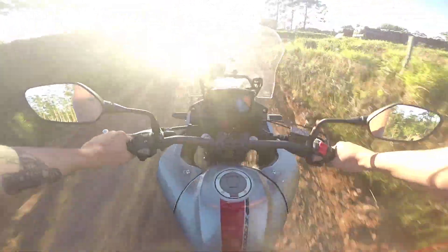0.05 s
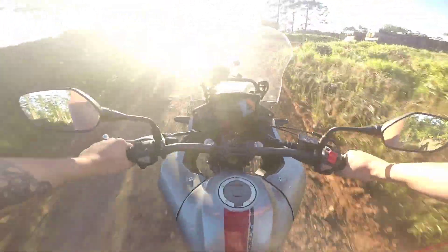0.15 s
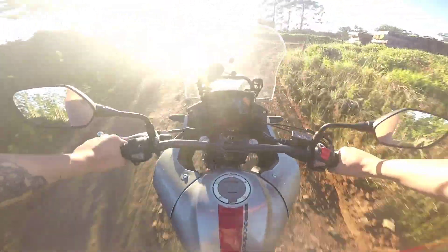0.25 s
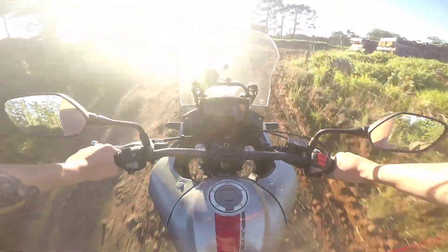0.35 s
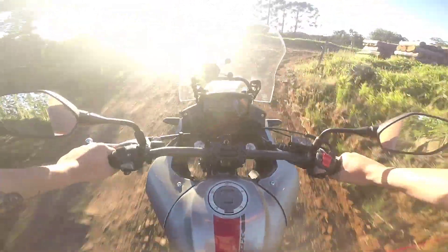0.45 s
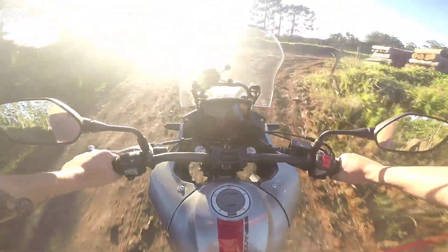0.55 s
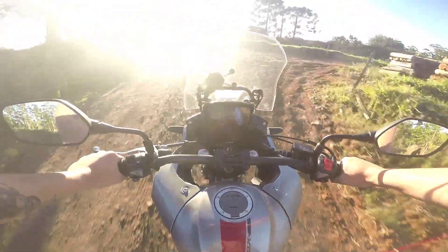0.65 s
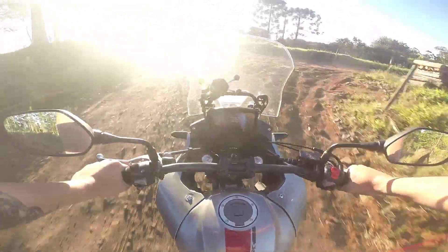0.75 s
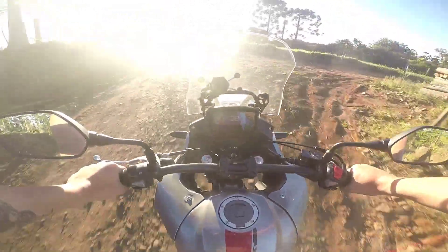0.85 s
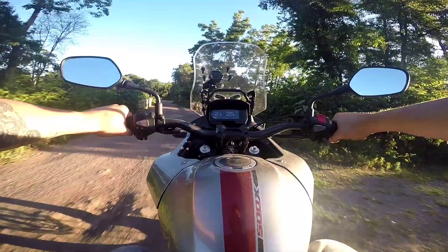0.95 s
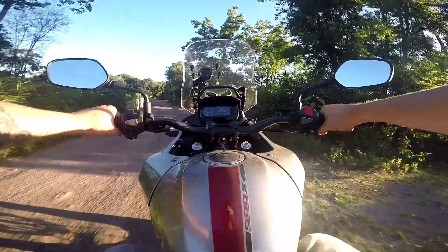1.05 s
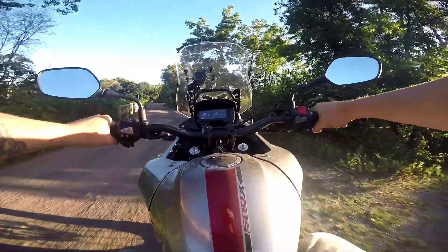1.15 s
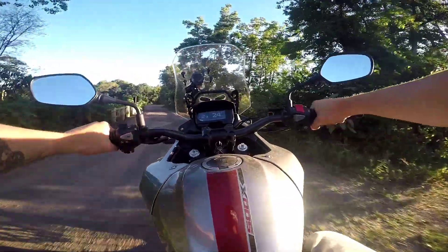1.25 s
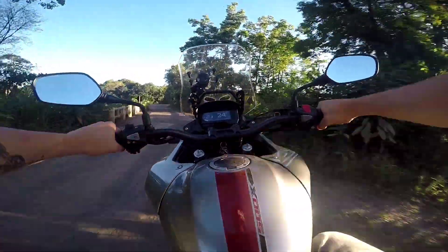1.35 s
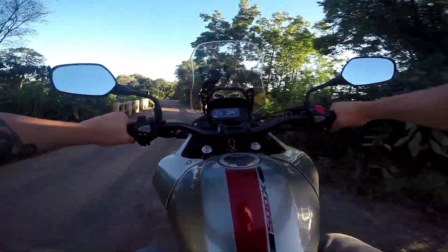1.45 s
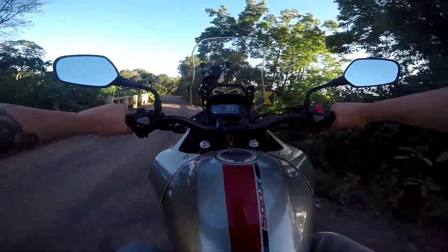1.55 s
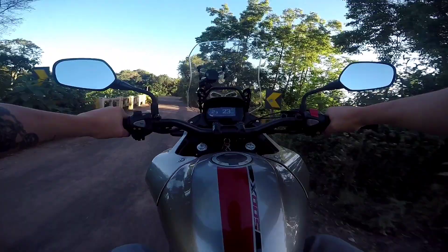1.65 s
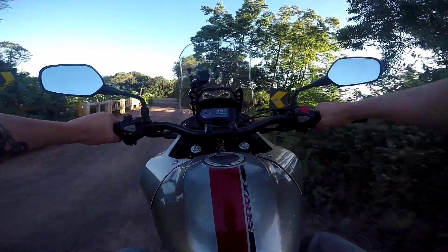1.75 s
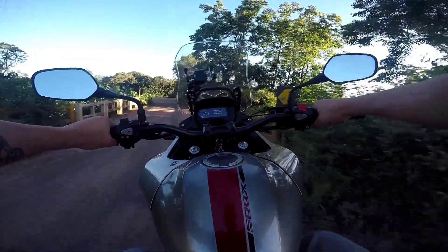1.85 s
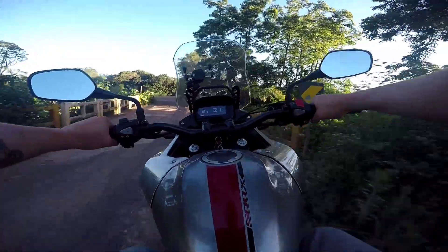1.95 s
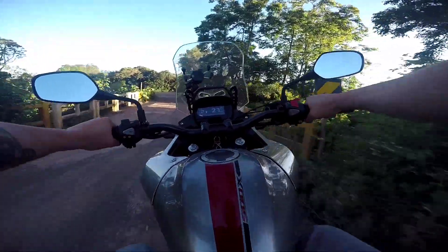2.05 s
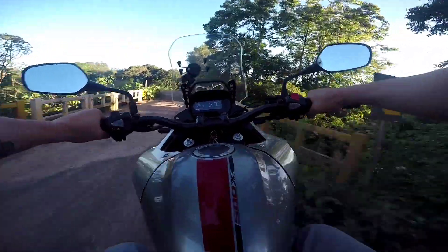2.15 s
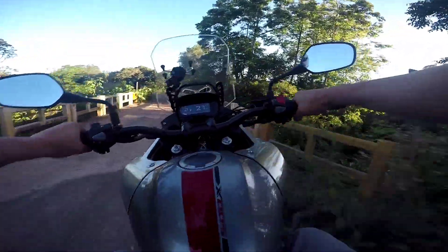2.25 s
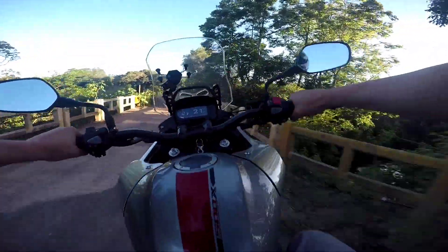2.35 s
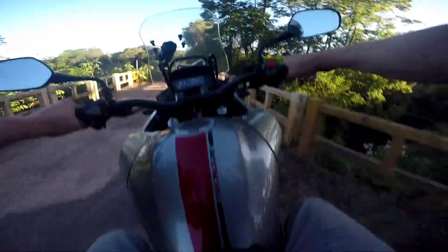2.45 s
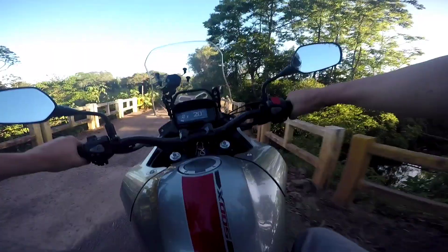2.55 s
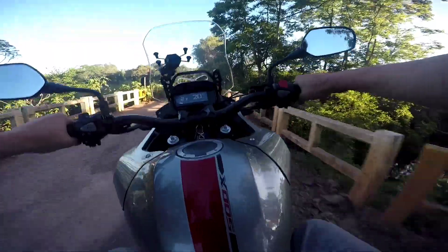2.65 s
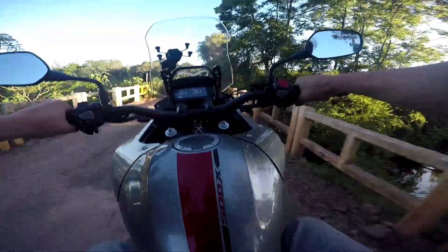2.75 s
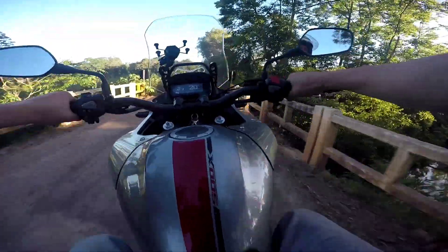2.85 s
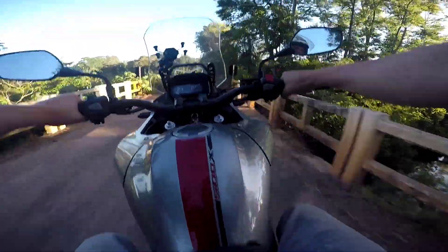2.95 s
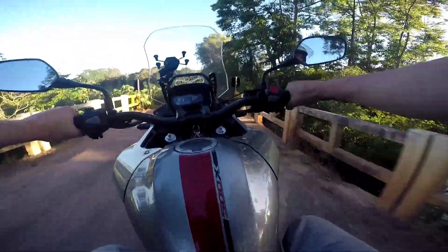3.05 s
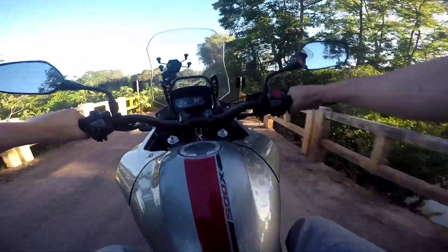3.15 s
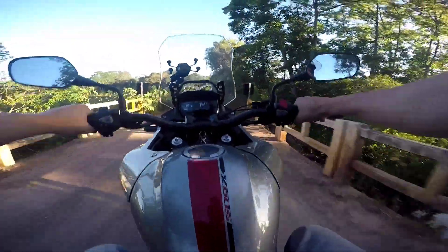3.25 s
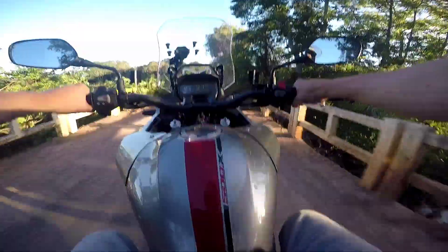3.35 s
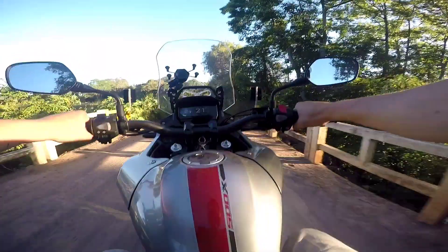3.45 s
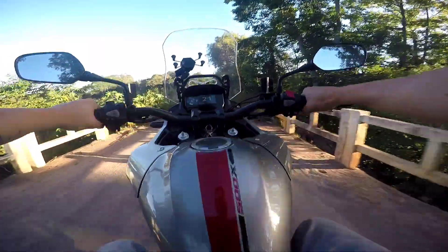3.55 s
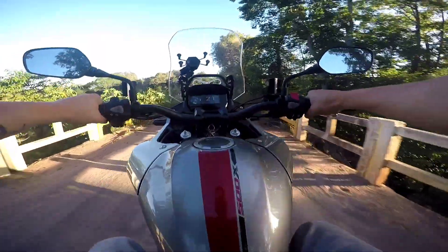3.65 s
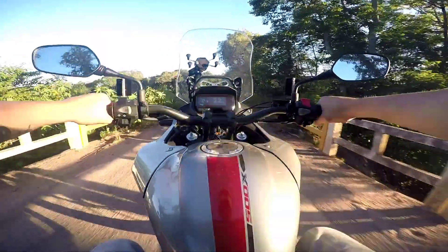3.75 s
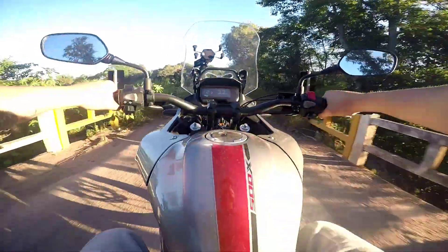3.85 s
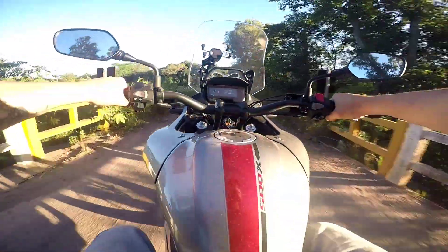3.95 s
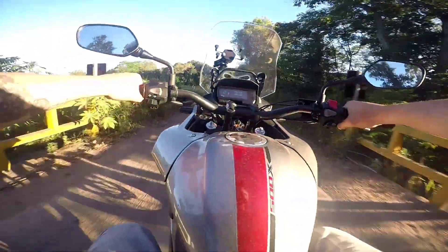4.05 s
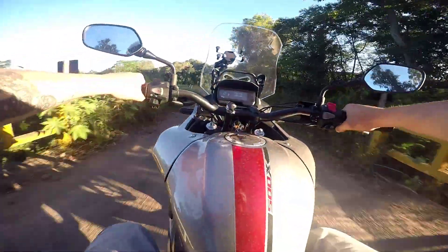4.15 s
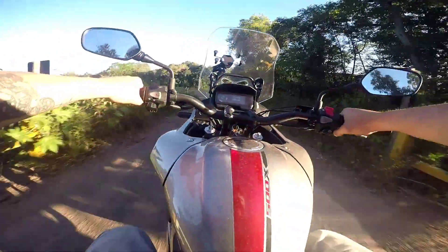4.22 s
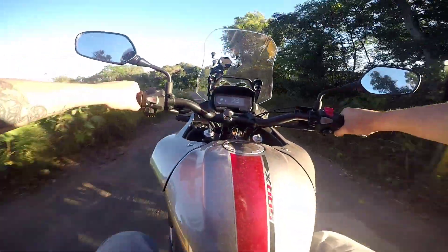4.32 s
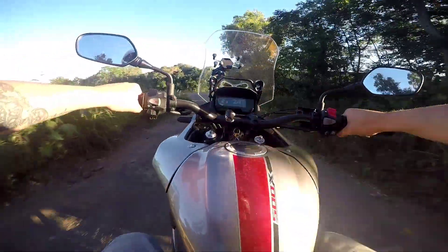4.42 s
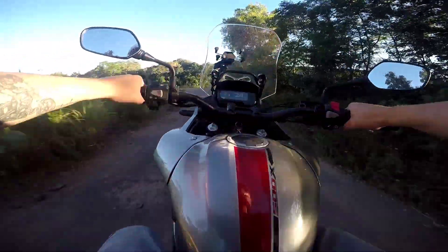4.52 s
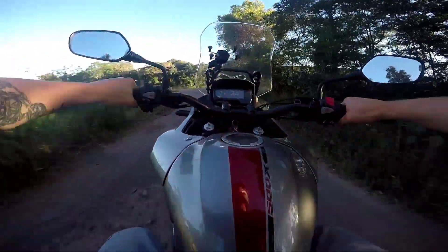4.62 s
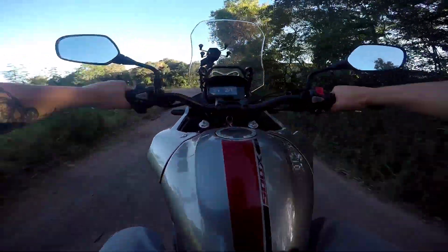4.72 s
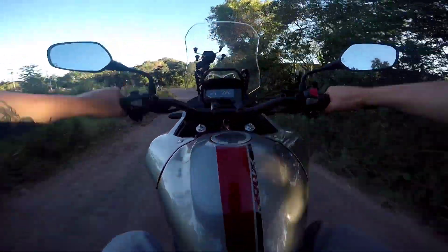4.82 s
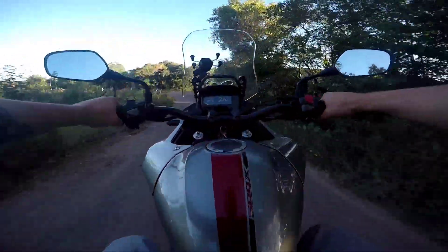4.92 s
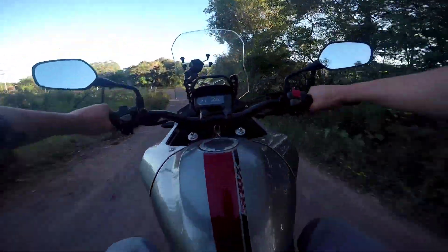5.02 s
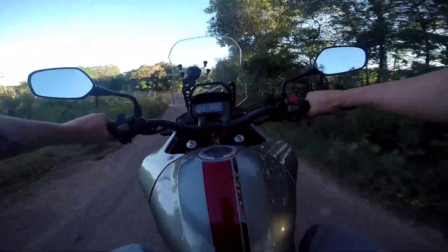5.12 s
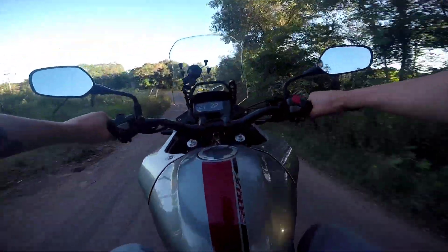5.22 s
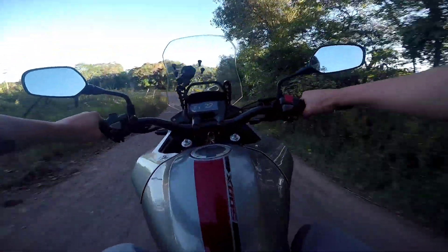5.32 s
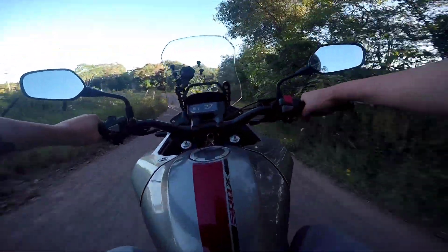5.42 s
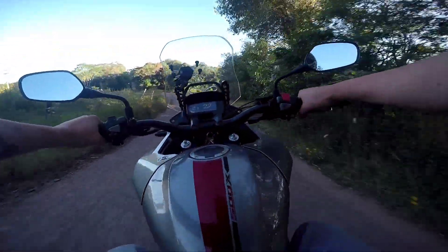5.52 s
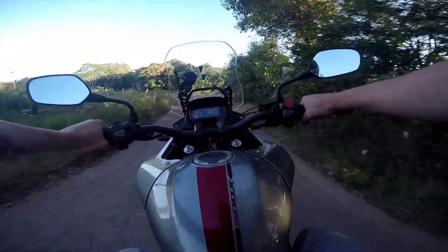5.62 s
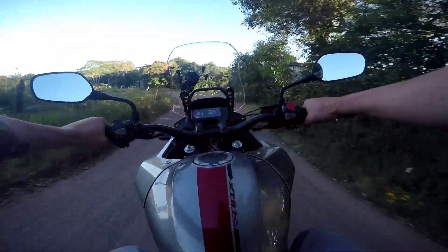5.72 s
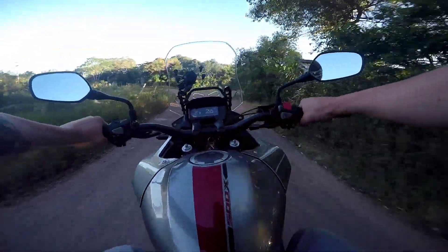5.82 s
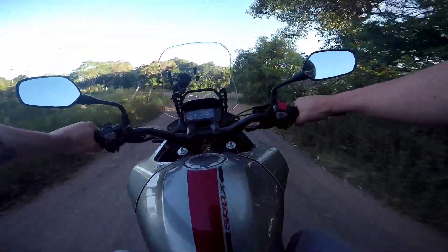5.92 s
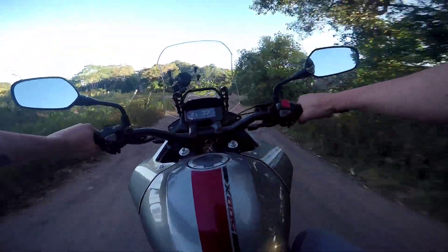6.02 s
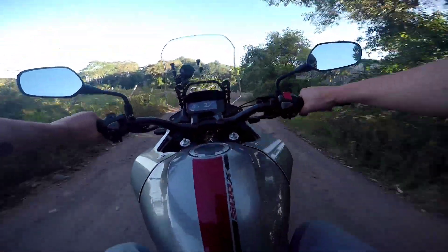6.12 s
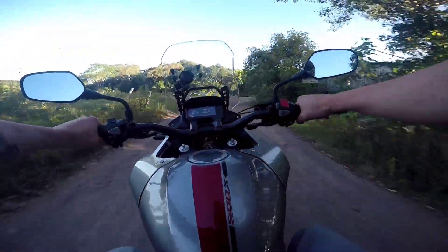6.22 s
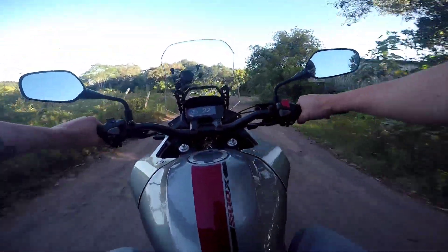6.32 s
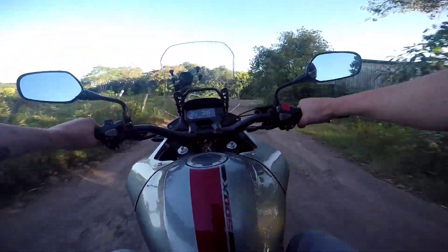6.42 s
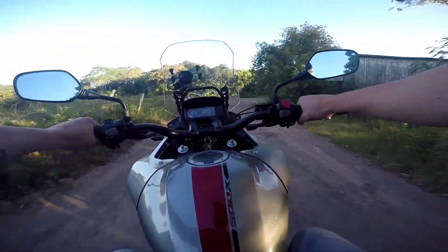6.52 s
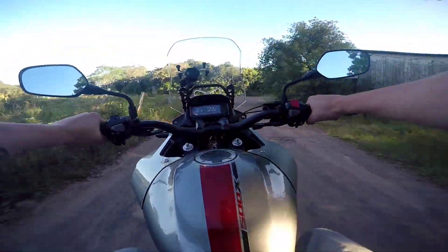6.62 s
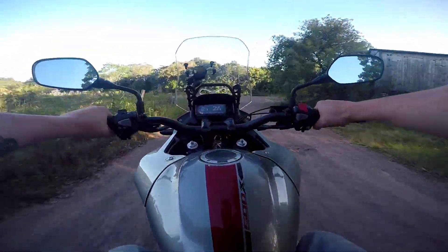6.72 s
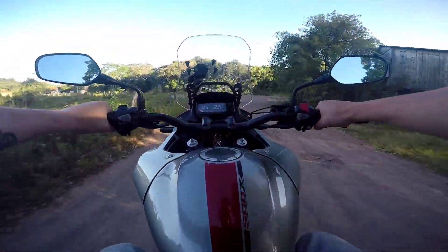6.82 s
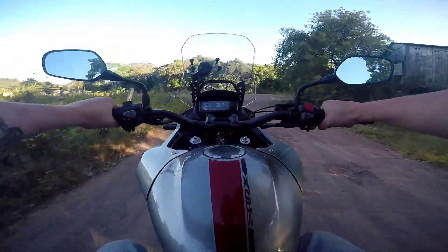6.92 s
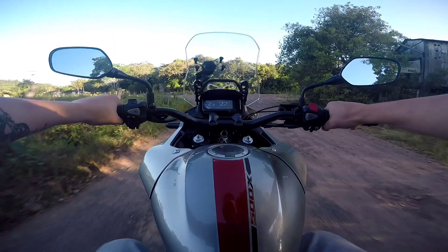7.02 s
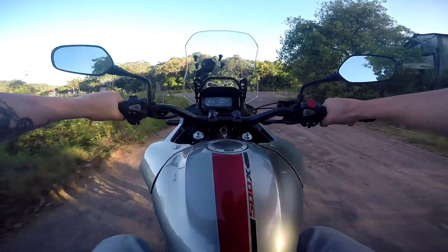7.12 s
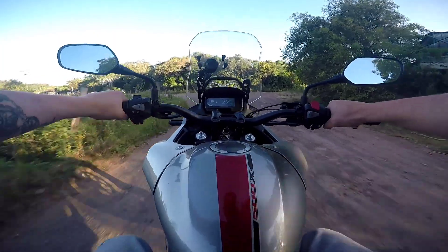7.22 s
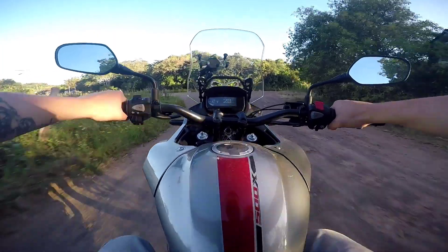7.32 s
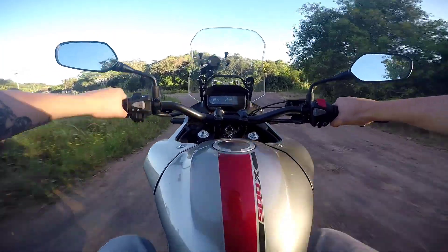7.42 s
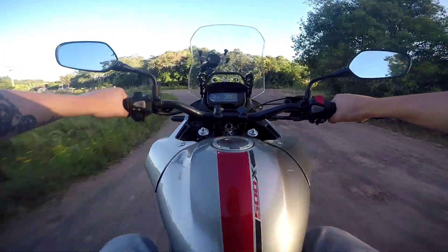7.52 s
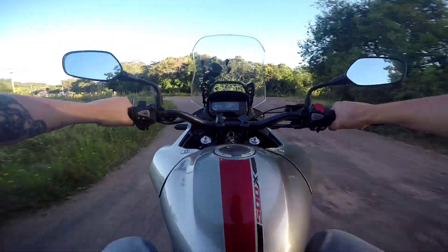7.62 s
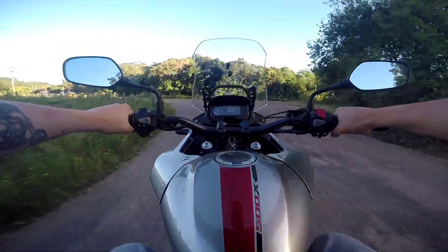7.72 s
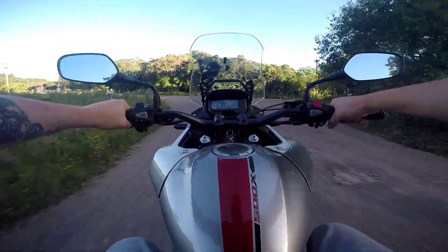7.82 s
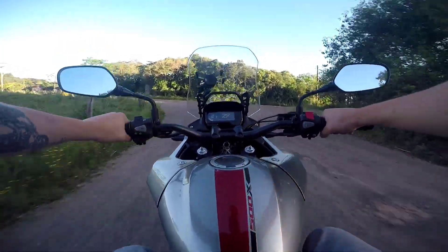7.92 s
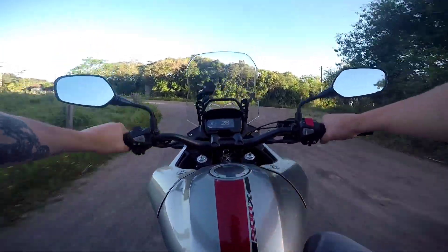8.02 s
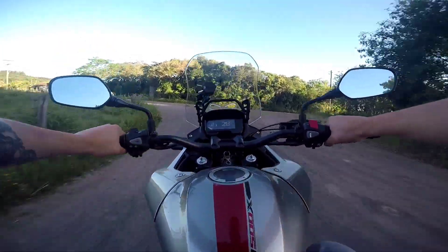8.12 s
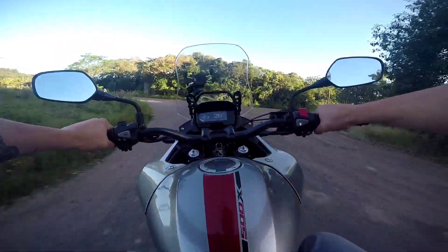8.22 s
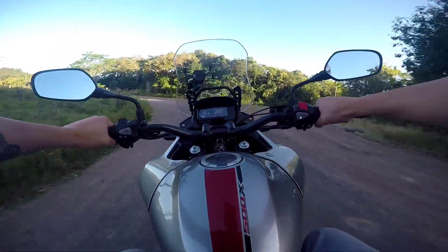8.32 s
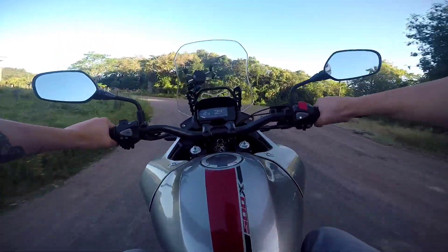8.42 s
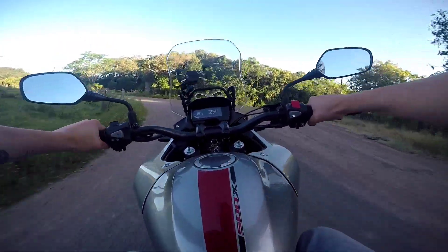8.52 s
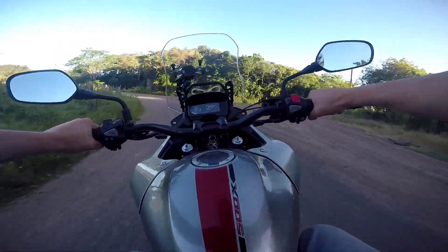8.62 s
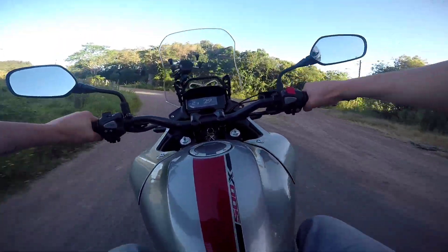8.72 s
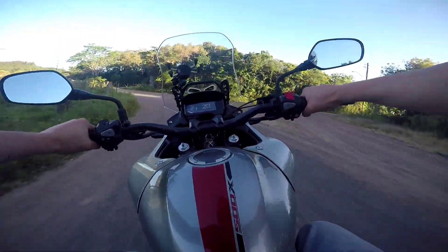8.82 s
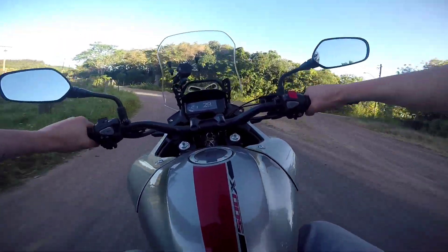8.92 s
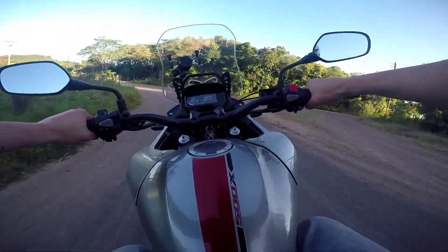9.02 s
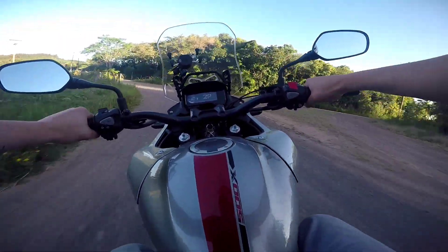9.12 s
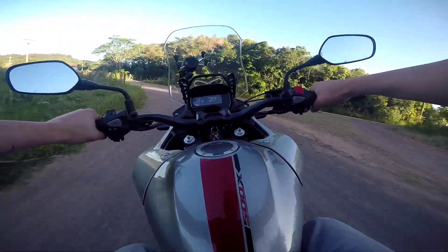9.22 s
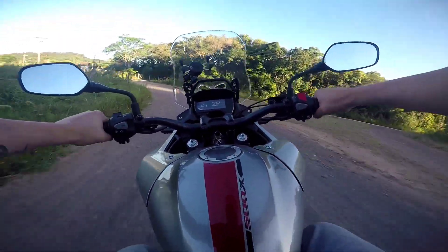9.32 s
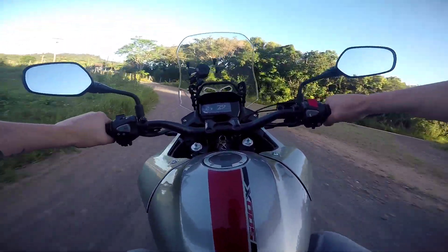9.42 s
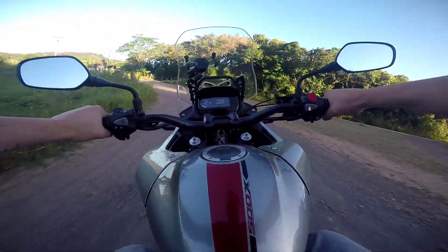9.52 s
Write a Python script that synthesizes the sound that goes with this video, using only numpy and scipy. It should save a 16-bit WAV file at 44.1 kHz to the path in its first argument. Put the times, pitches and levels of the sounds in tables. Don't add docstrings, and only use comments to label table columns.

```python
import sys
import numpy as np
from scipy import signal
from scipy.fft import rfft, irfft
from scipy.io import wavfile
from scipy.ndimage import uniform_filter1d

SR = 44100
rng = np.random.default_rng(int(sys.argv[2]) if len(sys.argv) > 2 else 0)


def transcribe(signal):
    frames = np.atleast_2d(signal).T
    limited = np.clip(frames, -1, 1)
    pcm = np.round(limited * 32767).astype(np.int16)
    wavfile.write(sys.argv[1], SR, pcm)


def ratio(d):
    e = np.asarray(d, float) / 20
    return 10 ** e


N = 421596
TIME = np.arange(N) / SR
CUT_START_S, CUT_END_S = .9213, .9268


def unit(x):
    return x / np.sqrt(np.mean(np.abs(x) ** 2))


def ring(x, hz, width):
    r = np.exp(-np.pi * 1.5 * width / SR)
    pole = r * np.exp(2j * np.pi * hz / SR)
    return signal.lfilter([(1 - r) ** 2], [1, -2 * pole, pole ** 2], x)


def band(x, low_hz, high_hz):
    return signal.sosfilt(signal.butter(2, [low_hz, high_hz], "bandpass", fs=SR, output="sos"), x)


def walk(rate):
    hold = int(SR / rate)
    levels = np.repeat(rng.standard_normal(N // 200), hold)[:N]
    return unit(uniform_filter1d(uniform_filter1d(levels, hold), hold))


def columns(rows):
    s, *values = np.transpose(rows)
    return [np.interp(TIME, s, v) for v in values]


def swells(rows):
    s, half_s, *values = np.transpose(rows)
    coarse = TIME[::64]
    bells = np.exp(-((coarse - s[:, None]) / half_s[:, None]) ** 2)
    return [np.interp(TIME, coarse, v @ bells) for v in values]


def coloured(spectrum, alike):
    hz, db = np.transpose(spectrum)
    common, left, right = rng.standard_normal((3, N))
    pair = np.sqrt(alike) * common + np.sqrt(1 - alike) * np.array([left, right])
    bins_hz = np.arange(N // 2 + 1) * SR / N
    gain = ratio(np.interp(np.log(bins_hz + 1), np.log(hz), db))
    return unit(irfft(rfft(pair) * gain, N))


def body(modes, gate, grit_db, flicker_db, swell_db):
    out, swell = 0, swell_db * walk(6.6)
    for hz, width, db, pan_db, lead, alike in modes:
        grains = np.minimum(rng.exponential(size=N // 128 + 1), 4)
        grit = np.repeat(ratio(grit_db * grains), 128)[:N]
        common, left, right = (unit(ring(grit * gate * v, hz, width)) for v in rng.standard_normal((3, N)))
        pair = np.sqrt(alike) * np.array([common * np.exp(1j * lead), common])
        pair = pair + np.sqrt(1 - alike) * np.array([left, right])
        pan = np.array([[pan_db], [-pan_db]]) / 2
        out = out + ratio(db + swell + flicker_db * walk(14) + pan) * pair.real
    return out / np.std(out.mean(axis=0))


def crank():
    # t/s, cycle rate/Hz
    speed = [(0, 23.05), (.92, 23.05), (.93, 20.5), (1.27, 18.8), (2.1, 16.9), (3.04, 17.05), (3.64, 18.05),
             (4.59, 21.05), (5.4, 22.7), (5.64, 22), (6.11, 21.5), (6.73, 21.75), (7.21, 22.65),
             (7.75, 24.9), (8.05, 23.6), (8.45, 23.7), (9.12, 23.9), (9.58, 23.2)]
    # t/s, half length/s, change/Hz
    bends = [(1.55, .25, .36), (2.4, .25, -.32), (2.1, .1, -.5), (2.95, .2, -.55), (3.8, .15, .5),
             (5.52, .06, -2.3), (6.6, .3, .15), (7.92, .08, -1.6), (8.61, .07, 1.6), (8.72, .05, -1),
             (9.29, .09, -1.7)]
    start = .125 + .57 * (TIME > CUT_END_S)
    return np.cumsum(columns(speed)[0] + swells(bends)[0]) / SR + start


def exhaust(cycles, shut, load_db):
    # f/Hz, width/Hz, level/dB
    upper_modes = [(150, 60, 1), (240, 36, 1.5)]
    # t/s, half length/s, change/dB
    throttle = [
        (5.65, .2, -3),
        (6.2, 0.21, -3.5),
        (7.6, 0.32, 4.5),
        (8.15, 0.31, -5),
        (8.75, 0.074, -1),
        (9.2, .3, -1.5),
    ]
    bright_db = swells(throttle)[0]
    upper_db = -26 - 16 * shut + swells([(4.05, 1.0, 15)])[0]

    first = np.arange(1, int(cycles[-1]))
    chance = rng.standard_normal((300, 4))[:len(first)].T
    jitter = .003
    pulses, puffs = np.zeros((2, N))
    for k, (place, db) in enumerate([(0, 0), (.247, -1.5)]):
        at = np.interp(first + place + jitter * chance[k], cycles, np.arange(N)).astype(int)
        pulses[at] = ratio(db + .5 * chance[k + 2])
        at = np.interp(first + place + 4 * jitter * chance[k], cycles, np.arange(N)).astype(int)
        puffs[at] = ratio(2 * chance[k + 2])

    pipe = unit(band(ring(pulses, 101, 50).imag, 72, 145))
    turn = np.exp(10j * np.pi * cycles)
    still = pipe / turn
    slow = uniform_filter1d(still.real, size=2000) + 1j * uniform_filter1d(still.imag, size=2000)
    pipe = pipe + (ratio(bright_db) - 1) * 2 * (slow * turn).real

    upper = sum(ratio(db) * ring(pulses, hz, width).imag for hz, width, db in upper_modes)
    upper = unit(band(upper, 110, 330))
    drone = unit(band(ring(pulses, 71, 30).imag, 40, 120))
    puff = unit(band(band(ring(puffs, 92, 90).imag, 40, 170), 40, 170))
    pulling = ratio(upper_db + bright_db) * upper - pipe - ratio(-26 - 1.01 * bright_db) * drone
    boom = ratio(load_db + 3.5) * ((1 - shut) * pulling + shut * ratio(1) * puff)
    return np.array([np.roll(boom, 22), boom])


def shell(gate, shaken_db):
    # f/Hz, width/Hz, level/dB, left minus right/dB, left lead/rad, share alike
    shell_modes = [(95.8, 32, -4.5, -1, 2.7, 0.29), (130, 122, -9, 2, 2.13, 0.41),
                   (265, 120, -6.5, -2.5, 2.6, 0.72), (428, 222, -8, -4.5, 2.89, 0.91),
                   (602, 90, -5.5, -4, 2.94, 0.97), (773, 133, -10, -7.5, 3.05, 0.91),
                   (1066, 180, -4.5, 1, 2.75, 0.98), (1220.5, 62, -8, 2.5, 3.08, 0.94)]
    return ratio(shaken_db) * body(shell_modes, gate, 2.85, 0.76, 0.48)


def panel(gate, air_db):
    # f/Hz, width/Hz, level/dB, left minus right/dB, left lead/rad, share alike
    panel_mode = [(827.7, 61, 0, -2.5, 2.59, 0.98)]
    # t/s, half length/s, level/dB
    spells = [(0, 0.33, 5.5), (1.1, 0.26, 10), (2.35, 0.51, 2), (3.12, 0.13, 9.5), (4.7, 0.15, 2),
              (5.3, 0.11, 2.5), (5.9, 0.55, 8), (6.91, 0.19, 11.5), (7.54, 0.34, 5), (8.12, 0.16, 5.5),
              (9.35, 0.18, 10)]
    return ratio(air_db - 5.5 + swells(spells)[0] + 3) * body(panel_mode, gate, 0.91, 2.1, 0.99)


def port(gate, air_db, load_db, first_scene):
    # f/Hz, width/Hz, level/dB, left minus right/dB, left lead/rad, share alike
    port_modes = [(1770, 215, 5, 7.5, 2, 0.96), (1895, 263, 1.5, -10, 0.27, 0.9),
                  (2298, 320, -8, -16, 1.4, 0.38)]
    port_db = air_db + 9 - 7 * first_scene + 0.13 * (load_db - load_db.mean())
    return ratio(port_db - 0.94) * body(port_modes, gate, 0.69, 0.83, 0.08)


def vent(gate, air_db):
    # f/Hz, width/Hz, level/dB, left minus right/dB, left lead/rad, share alike
    vent_modes = [(2825, 1380, 0.5, -4.5, 0.24, 0.77), (5040, 1250, -4.5, -2, 3.28, 1),
                  (7480, 430, -7, 1.5, 2.1, 0.19)]
    return ratio(air_db - 0.5) * body(vent_modes, gate, 1.0, 0.58, 0.71)


def hiss(air_db):
    # f/Hz, density/dB per Hz
    hiss_spectrum = [(1530, -3.5), (2600, 0), (3300, -7), (4000, -15.5), (4440, -7.5), (4900, -12),
                     (6540, -9.5), (7640, -12), (8250, -11.5), (12400, -24), (13200, -28), (15500, -30)]
    flutter_db = 0.65 * walk(30) + .5 * walk(7.2)
    left, right = ratio(air_db + 2 + flutter_db) * coloured(hiss_spectrum, 0.25)
    return np.array([np.roll(left, 21), right])


def buffet(road_db, gust_db):
    # f/Hz, density/dB per Hz
    buffet_spectrum = [(4, -25), (9, 0), (20, -6), (32, -13.5), (45, -18), (80, -24), (150, -32),
                       (700, -125)]
    return ratio(road_db + 6.5 + gust_db + 5 * walk(7.2)) * coloured(buffet_spectrum, 0.58)


def rattles():
    # t/s, peak/dB, ring f/Hz, fade/s
    taps = [(0.0315, -11, 880, 0.0033), (0.082, -21, 570, 0.014), (0.098, -19, 946, 0.0086),
            (0.099, -9, 540, 0.0018), (0.106, -6, 730, 0.0027), (0.228, -23, 850, 0.0062),
            (0.44, -4, 794, 0.0022), (0.596, -54, 806, 0.005), (1.1, -21, 843, 0.01),
            (1.104, -44, 895, 0.0068), (2.448, -42, 501, 0.0046), (2.448, -18, 501, 0.002),
            (2.455, -36, 905, 0.0037), (2.481, -34, 527, 0.0045), (2.519, -19, 467, 0.0055),
            (2.913, -30, 790, 0.0043), (2.9165, -20.5, 540, 0.0084), (2.93, -23, 510, 0.0054),
            (3.34, -29, 820, 0.005), (3.4065, -15, 1020, 0.0017), (4.78, -25, 575, 0.018),
            (4.973, -18, 600, 0.0036), (4.982, -2, 880, 0.0012), (4.985, -27, 773, 0.005),
            (3.433, -24, 420, 0.0031), (2.8813, -17, 680, 0.0023), (3.2944, -11, 1720, 0.00094),
            (8.6317, -14, 890, .002), (2.462, -24, 620, .003), (2.486, -21, 450, 0.0027),
            (2.528, -22, 600, 0.0027), (3.419, -24, 560, .003), (3.425, -28, 640, 0.0026),
            (2.924, -31, 420, .004), (2.937, -24, 597, .004)]
    # t/s, peak/dB
    pings = [(5.5, -30), (5.56, -20), (5.624, -24), (5.676, -25), (5.741, -21), (5.883, -34), (5.957, -36),
             (6.149, -23), (6.191, -24), (6.31, -47), (6.415, -29), (6.785, -25), (6.839, -42),
             (6.882, -29), (6.927, -23), (6.973, -23), (7.018, -24), (7.061, -22), (7.448, -31),
             (7.498, -30), (7.534, -25), (7.564, -28), (7.604, -23), (7.641, -21), (7.701, -28),
             (7.894, -39), (8.042, -42), (8.134, -24), (8.239, -24), (8.344, -32), (8.433, -31),
             (8.465, -27), (8.518, -27), (8.638, -34), (8.727, -22.5), (8.96, -23), (9.164, -30),
             (9.301, -26), (9.438, -20.5), (9.507, -43)]
    # t/s, peak/dB
    port_ticks = [(4.524, -13.5), (4.9028, -22), (4.9475, -14), (4.983, -11.5), (5.3057, -29),
                  (5.3352, -18), (5.417, -16), (5.8859, -16), (5.9882, -27), (6.2794, -18), (6.4501, -21),
                  (6.6764, -31), (7.2263, -21), (7.3987, -12), (7.4553, -22.5), (7.5398, -14),
                  (7.5701, -25), (7.593, -24), (7.6459, -17), (7.699, -15), (7.7876, -25), (8.2944, -22),
                  (8.5558, -28), (8.6317, -13.5)]
    out, t = np.zeros((2, N)), np.arange(2048) / SR
    for s, db, hz, fade in taps + [(s, db + 4, 836, 0.0072) for s, db in pings]:
        modes = np.sin(2 * np.pi * hz * t) + 0.24 * np.sin(2 * np.pi * 1.2 * hz * t)
        pair = modes * np.array([[-.4], [1]])
        pair = pair + ratio(-22) * np.sin(2 * np.pi * 1850 * t)
        swell = (1 - np.exp(-t / 0.0012)) * np.exp(-t / fade)
        out[:, int(s * SR):][:, :len(t)] += ratio(db + 8) * pair * swell
    tick = np.sin(2 * np.pi * 1822 * t) * (1 - np.exp(-t / 0.001)) * np.exp(-t / 0.003)
    for s, db in port_ticks:
        out[:, int(s * SR):][:, :len(t)] += ratio(db) * tick
    return out


def intake(gate, shut):
    # f/Hz, width/Hz, level/dB, left minus right/dB, left lead/rad, share alike
    breath = [(106.5, 40, 0, 0.02, 0.85, 1)]
    return ratio(-42) * shut * body(breath, gate, 1.0, 1.0, 0.79)


def knocks():
    # t/s, strength/dB, pitch share, gain duck/dB
    jerks = [(2.1799, -0.3, 1.06, 19), (2.3858, 0, 1.06, 27.5), (2.477, -8.5, 0.75, 1.5),
             (2.6018, -1.5, 1, 9), (2.881, -5.5, 0.71, 7), (2.8856, -9, 0.9, -1), (3.057, -1.5, 0.97, 6.5),
             (3.295, 0.5, 1.05, 23), (3.35, -17, 0.83, 8), (3.412, -15, 0.94, 0), (5.9128, -4, 0.89, 1),
             (7.8029, -.5, 0.97, 24), (8.1185, -7.5, 0.86, 1), (1.086, -17, 0.94, 1)]
    # f/Hz, fade/s, growth per ms at the left port, at the right port
    mount_modes = [(162, .002, 0, -.29), (289, .0027, -.3, .68), (445, .0012, 1.19, -1.82),
                   (837, .0017, -.3, .52), (1410, .0005, -.35, .65)]
    out, duck_db = np.zeros((2, N)), np.zeros(N)
    for s, db, pitch, depth_db in jerks:
        t = np.maximum(TIME - s, 0)
        near = slice(int(s * SR), int(s * SR) + 2048)
        u = pitch * t[near]
        for hz, fade, left, right in mount_modes:
            growth = np.array([[left], [right]]) * u / .001
            out[:, near] += ratio(db) * growth * np.exp(-u / fade) * np.sin(2 * np.pi * hz * u)
        out[:, near] += ratio(2 * db - 24) * np.exp(-u / .0015) * np.sin(2 * np.pi * 2080 * u)
        duck_db -= depth_db * (1 - np.exp(-t / 0.00035)) * np.exp(-t / 0.069)
    return out, duck_db


def heaves():
    # t/s, level/dB, f/Hz, left lead/s, direction
    pushes = [(2.434, -11, 26.8, 0.0061, -0.77), (2.46, -5, 32.2, 0.0095, 0.74),
              (2.522, -0.5, 122, 0.0023, 0.54), (2.883, -2.5, 157, -0.0026, 0.66),
              (2.922, -11, 37.8, 0.0052, 0.66), (3.058, -19, 118, -0.013, 0.66),
              (3.344, -18, 110, 0.0061, -0.78), (3.417, -10, 91, 0.0035, -.7),
              (2.4546, -12, 105, .001, -.7), (2.4762, -13, 130, 0.0012, -0.75),
              (3.336, -11.5, 24.2, 0.01, 0.93), (3.408, -21, 66.5, 0, 0.48)]
    out = 0
    for s, db, hz, lead, way in pushes:
        turns = np.clip(hz * (TIME - s + np.array([[lead], [0]])), 0, 1.5)
        out = out + way * ratio(db) * np.sin(2 * np.pi * turns) * np.sin(np.pi * turns / 1.5)
    return out


def gears(cycles):
    blur = walk(39.8) + 1j * walk(39.8)
    tone = (blur * np.exp(2j * np.pi * 37 * cycles)).real
    spell = swells([(4.47, 0.7, 1)])[0]
    return ratio(-38.5) * spell * tone * np.array([[-.2], [1]])


def gap(gate):
    # f/Hz, width/Hz, level/dB, left minus right/dB, left lead/rad, share alike
    whistle = [(3260, 160, 0, 0, .3, 0.7)]
    spell = swells([(8.15, 0.14, 0.95)])[0]
    return ratio(-44.5) * spell * body(whistle, gate, 1.0, 1.0, .5)


def scene():
    # t/s, engine load/dB, air speed/dB, road roughness/dB
    ride = [(0, -27, -44, -30.5), (.92, -28.5, -41, -33.5), (.93, -28, -44.5, -35.5),
            (1.7, -33, -43.5, -37.5), (2.15, -29.5, -46, -33.5), (2.4, -53, -43, -25),
            (2.75, -44, -49.5, -39.5), (2.95, -36, -48.5, -38.5), (3.27, -32, -47, -30.5),
            (3.6, -35, -51, -41), (4.3, -29.5, -43, -37), (5.2, -27, -42, -31), (6.0, -26, -42, -32.5),
            (6.4, -28.5, -43.5, -33.5), (7.1, -26, -43, -35), (7.7, -26.5, -41, -29), (8.3, -28, -43, -34),
            (9.56, -26.5, -42, -25.5)]
    # t/s, half length/s, buffet/dB, rush/dB, shake/dB
    gusts = [(.04, 0.064, 1, 5.5, 3), (.23, 0.035, 8, 0.5, 0), (.5, 0.3, -1.5, 3, 4.5),
             (.78, 0.084, -4.5, -0.5, 2), (1.25, .12, 0, 0.5, 0.5), (8.45, 0.09, 2.5, 1, 1),
             (9.05, 0.12, 2, 0, 0.5), (.88, 0.048, 11.5, 1.5, 2), (3.02, .05, -7, -0.5, 0.5),
             (9.53, .07, -8, 1, 0.5), (6.8, 0.14, 3, 0, 1), (1.48, 0.06, -2, -0.5, 1),
             (2.3, 0.081, -4, -0.5, -4), (2.455, 0.011, 25.5, 13.5, 10), (2.92, 0.028, 2, 7, 13),
             (3.21, 0.074, -2, 1.5, -2), (3.42, 0.065, 12, 3.5, 5.5), (3.72, 0.054, -14, 1, -2),
             (4.25, 0.16, 5, -1, 0), (4.52, 0.022, 5, 2.5, 4.5), (4.83, 0.034, 7, 0, 1),
             (5.11, 0.091, 4.5, -0.5, -1.5), (5.43, 0.043, 3, -0.5, -3), (5.94, 0.032, 7, -3, -8),
             (6.55, 0.099, -11, 0.5, 2), (7.08, 0.027, 7, 0.5, 3), (7.42, 0.08, 4, 1, 3.5),
             (7.59, 0.058, -4, 0, 3.5), (8.6, 0.064, 3.5, 2.5, 1.5), (8.91, 0.1, -8, 0.5, -0.5),
             (9.34, 0.34, -6, 0.5, -5)]
    load_db, air_db, road_db = columns(ride)
    gust_db, rush_db, shake_db = swells(gusts)
    air_db = air_db + rush_db
    cycles = crank()
    first_scene = TIME < CUT_END_S
    shut = ~first_scene / (1 + np.exp((TIME - 3.35) / .1))
    gate = 1 + 0.033 * np.cos(8 * np.pi * cycles) + 0.086 * np.cos(2 * np.pi * cycles)

    mix = exhaust(cycles, shut, load_db) + intake(gate, shut) + gears(cycles)
    mix = mix + shell(gate, road_db + shake_db) + panel(gate, air_db)
    mix = mix + port(gate, air_db, load_db, first_scene) + vent(gate, air_db) + gap(gate)
    mix = mix + hiss(air_db) + buffet(road_db, gust_db)
    knock, duck_db = knocks()
    return ratio(duck_db) * mix + knock + rattles() + heaves()


def limit(x):
    return x / (1 + x ** 8) ** (1 / 8)


def treble_holes(x):
    # f/Hz, share
    holes = [(4400, 0), (5300, .15), (5900, .03), (8000, .06), (10200, .5), (13000, .6)]
    # from t/s, f/Hz
    top_edges = [(0, 13700), (.9, 15000), (2.2, 13800), (7.8, 14500)]
    size = 2048
    hz, s, z = signal.stft(x, SR, nperseg=size)
    wide, long = round(170 * size / SR), round(.075 * SR / size * 2)
    chance = rng.standard_normal(z.shape[1:])
    chance = uniform_filter1d(uniform_filter1d(chance, wide, axis=0), long, axis=1)
    rank = chance.ravel().argsort().argsort().reshape(chance.shape) / chance.size
    starts, edge_hz = np.transpose(top_edges)
    over = (hz[:, None] - edge_hz[np.searchsorted(starts, s, "right") - 1]) / 2000
    share = np.interp(hz, *np.transpose(holes))[:, None] + np.clip(over + .5, 0, 1)
    return signal.istft(z * (rank >= share), SR, nperseg=size)[1][:, :N]


def low_pass(x):
    return signal.sosfilt(signal.butter(12, 15500, fs=SR, output="sos"), x)


def record(dry):
    blank = (TIME > CUT_START_S) & (TIME < CUT_END_S)
    fade = uniform_filter1d(np.where(blank, ratio(-30), 1.), size=5)
    mix = treble_holes(limit(dry)) * fade
    return low_pass(mix)


dry = scene()
out = record(dry)
transcribe(out)
```